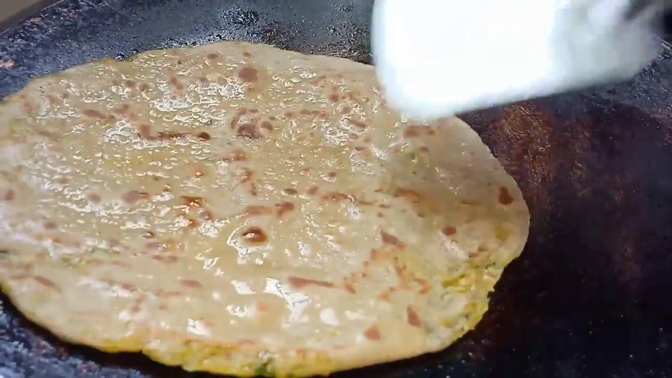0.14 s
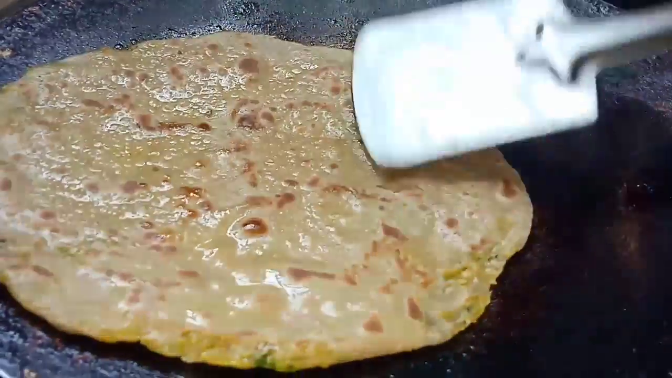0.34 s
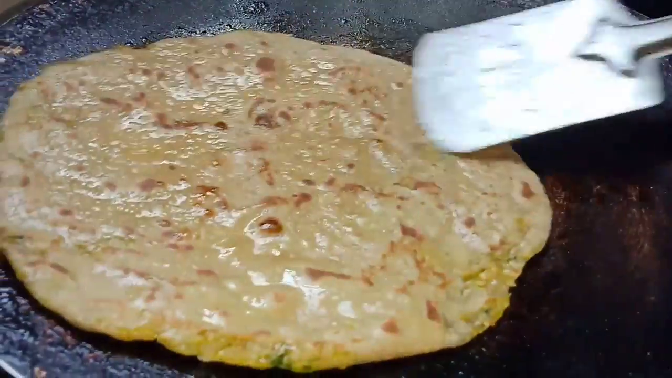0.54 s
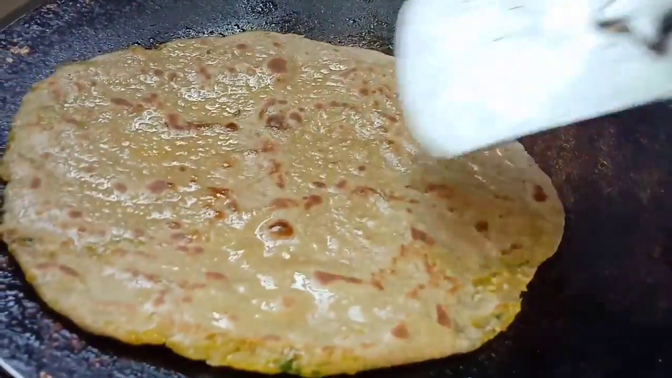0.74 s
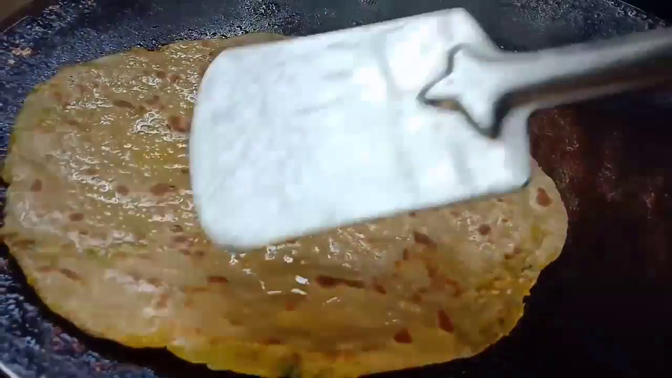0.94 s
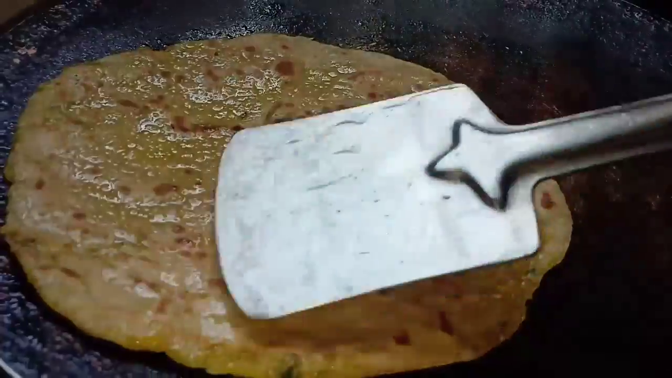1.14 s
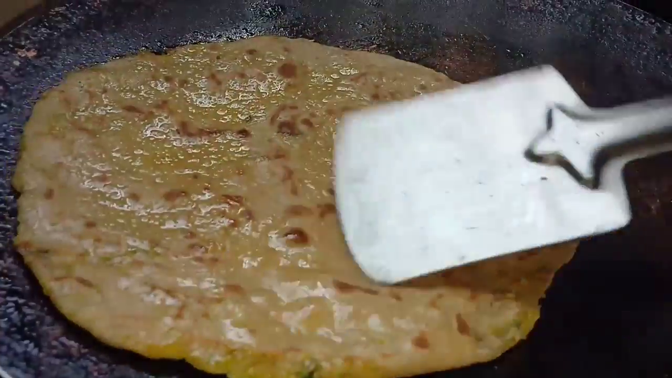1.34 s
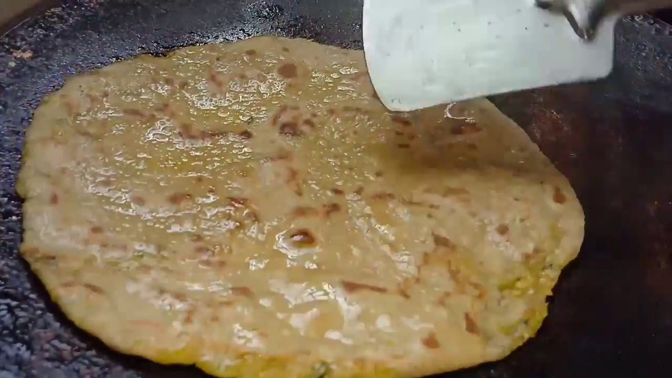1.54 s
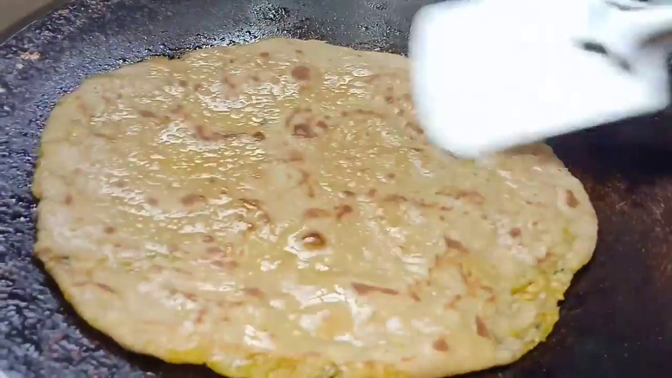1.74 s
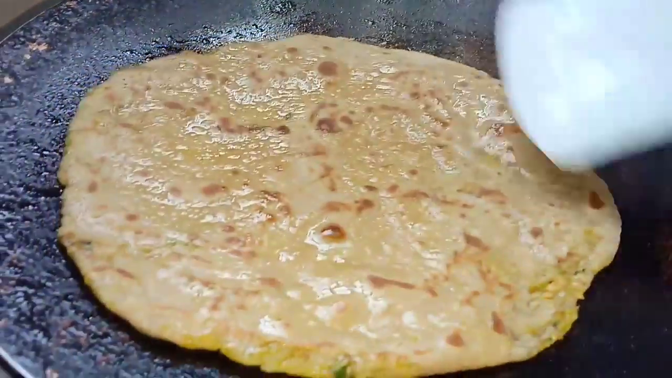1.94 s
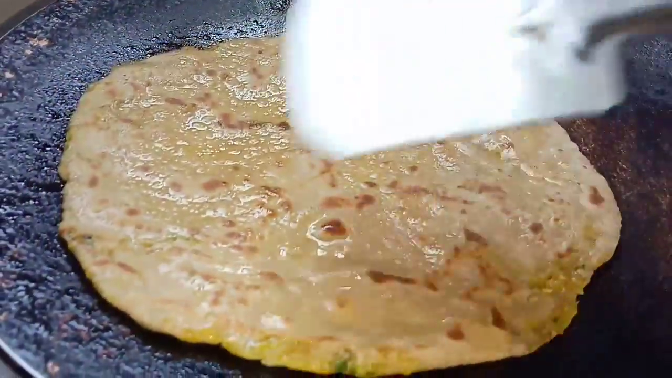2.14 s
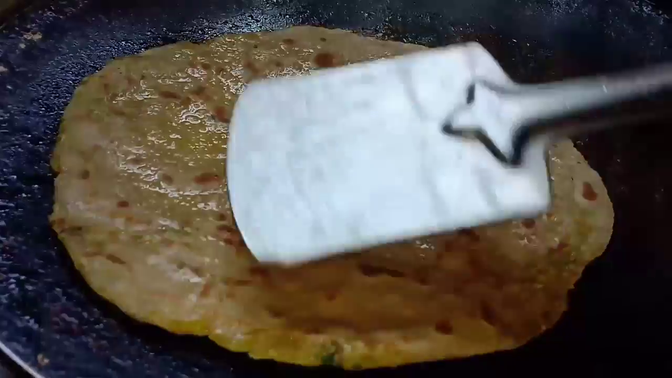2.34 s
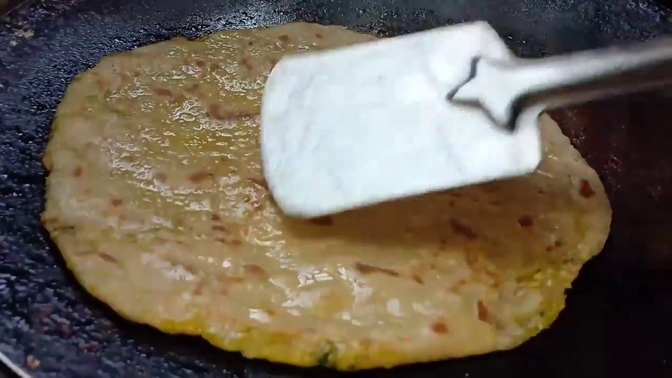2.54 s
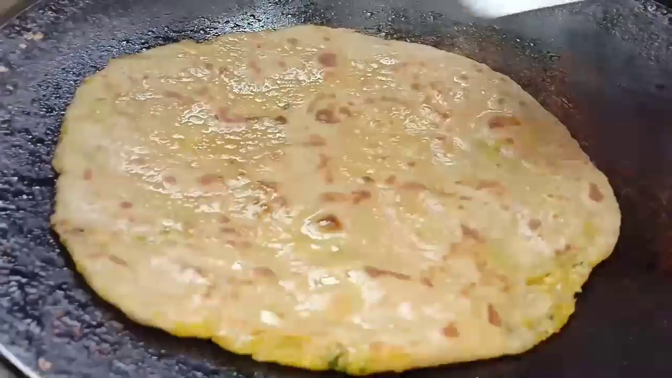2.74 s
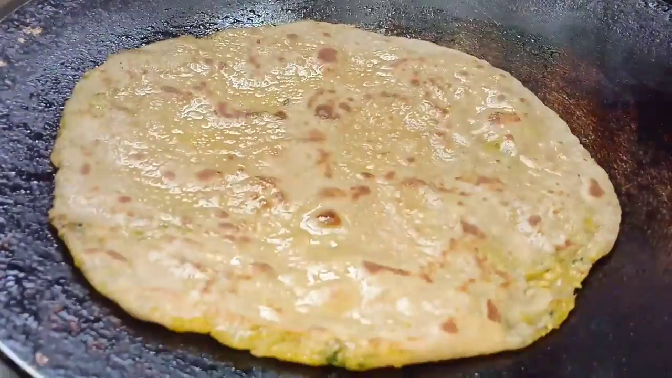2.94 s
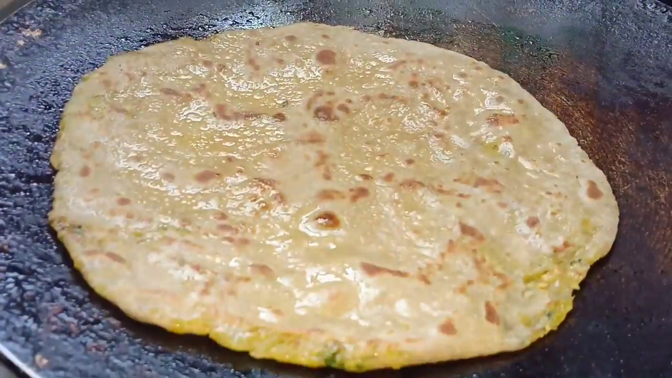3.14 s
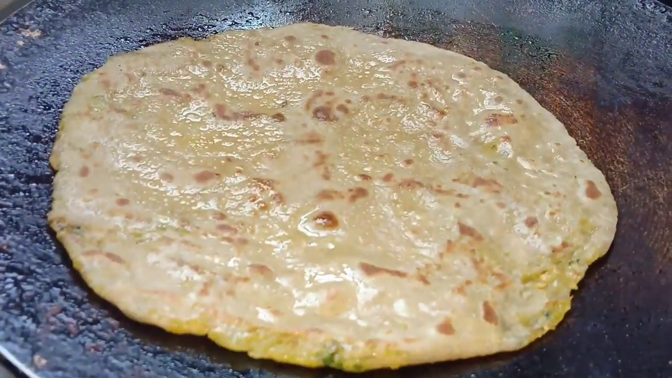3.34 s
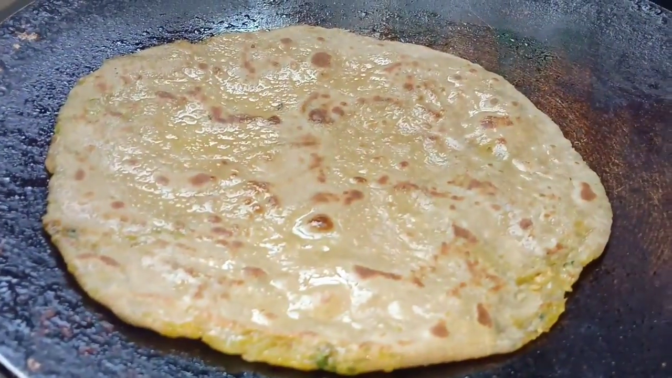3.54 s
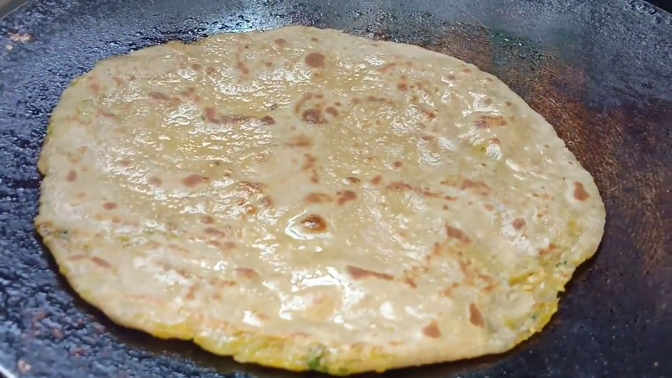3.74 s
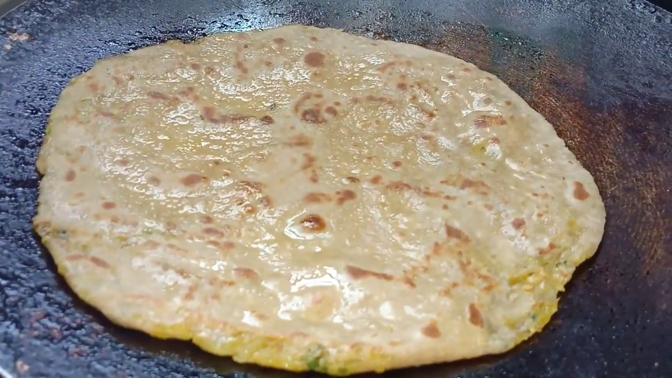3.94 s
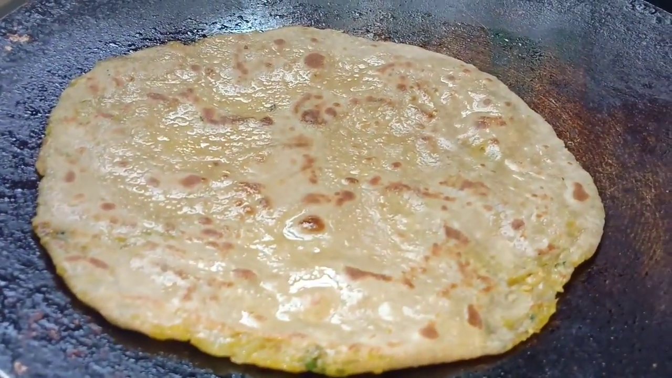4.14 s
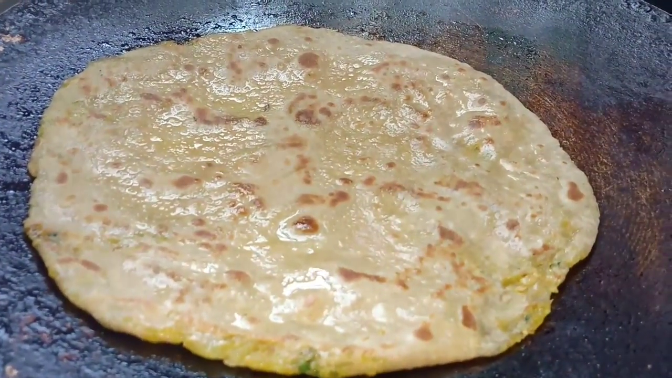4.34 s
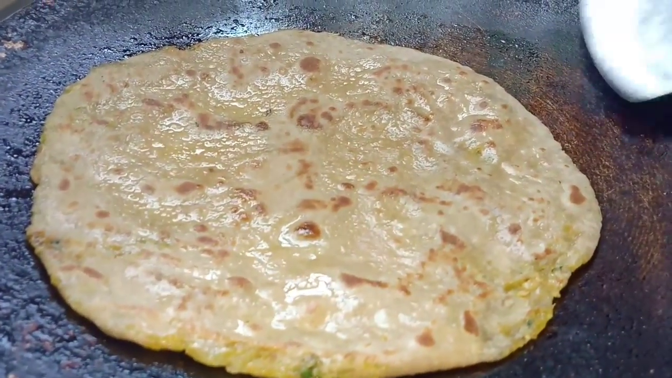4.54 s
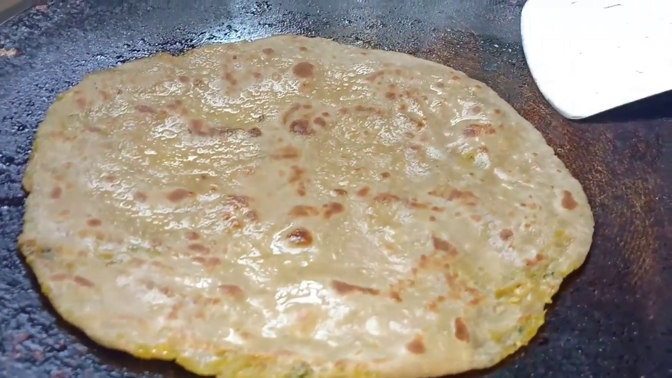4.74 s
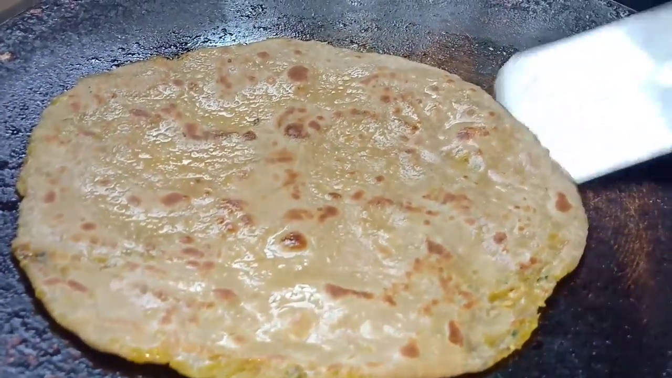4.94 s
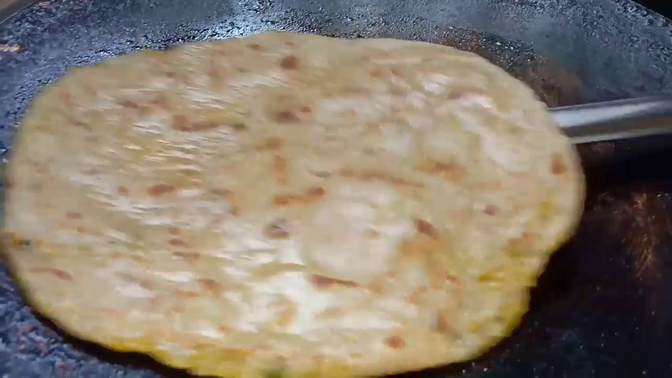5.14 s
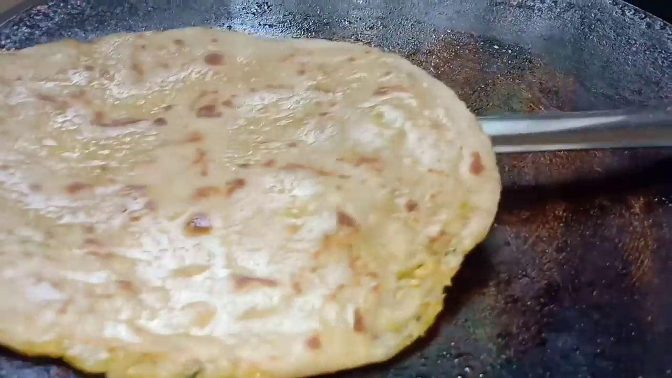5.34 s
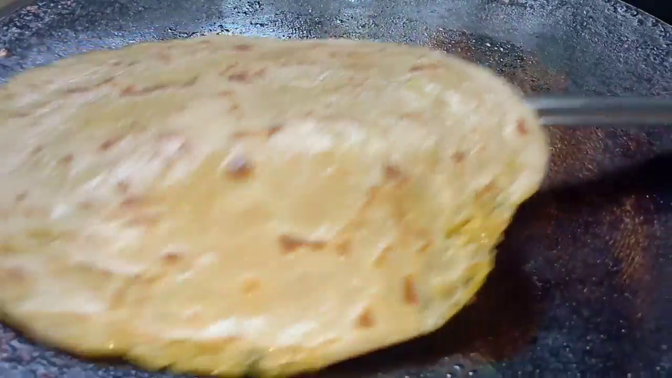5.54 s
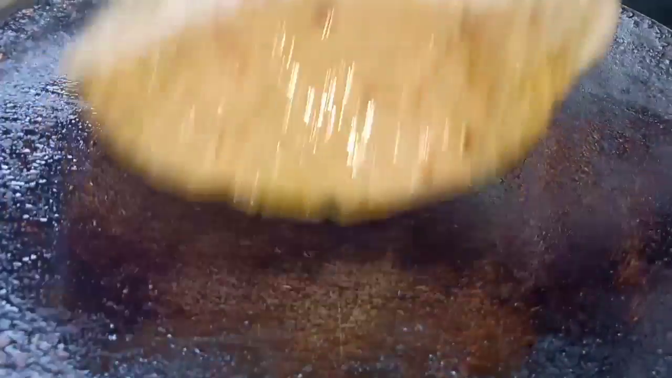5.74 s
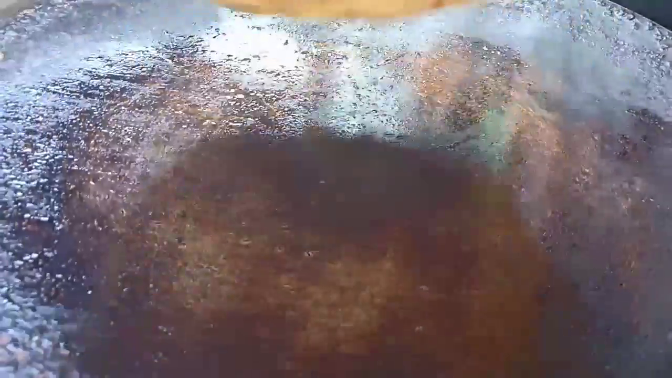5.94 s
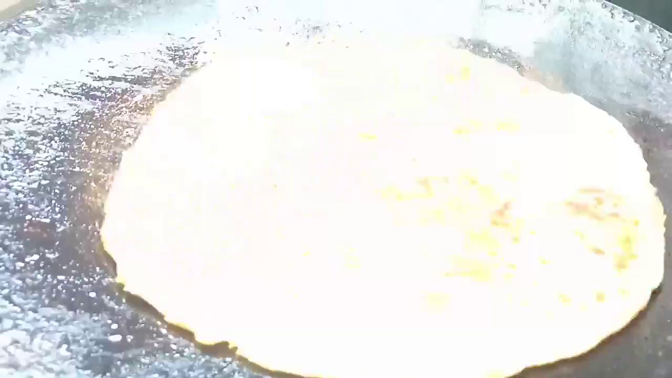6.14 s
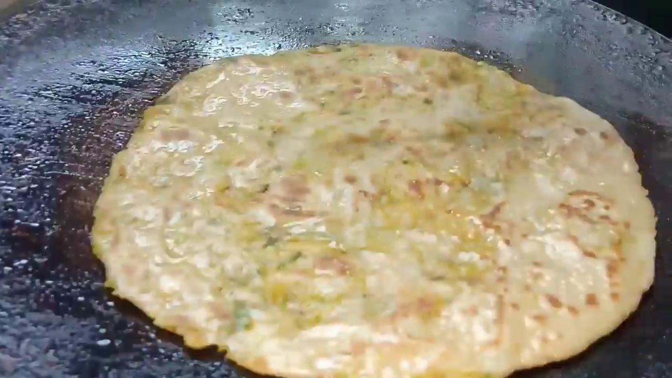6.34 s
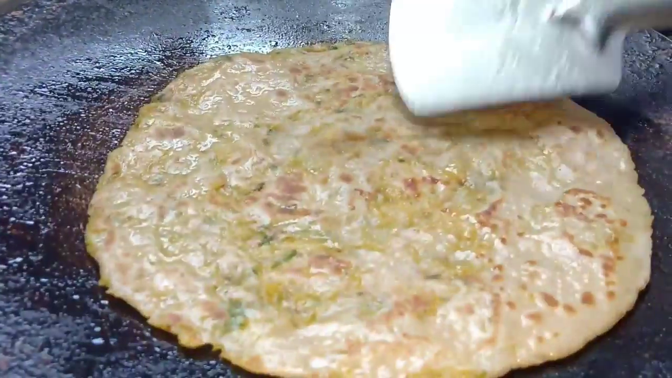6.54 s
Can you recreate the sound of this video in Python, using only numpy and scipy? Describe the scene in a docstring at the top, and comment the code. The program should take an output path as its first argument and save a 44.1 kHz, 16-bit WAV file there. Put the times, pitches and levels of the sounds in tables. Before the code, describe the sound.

Flatbread sizzles faintly on an iron griddle while a metal spatula pats it, clinks, scrapes underneath, then the bread flips over with a wet slap.

```python
"""Small kitchen, close on a hot iron griddle: a flatbread fries over a faint sizzle and a low hum.
First a steel spatula pats and rubs the bread (contact noise ringing pan modes), fat pops in short clicks
and thin steam whistles waver. Two dull thumps sound nearby (damped low modes). Then the blade clinks on
iron, scrapes under the bread (grains ringing blade modes) as the sizzle flares, and clinks again.
The turned bread lands with a wet slap, a third thump follows, and it fries on more softly under a last pat."""
import sys
import numpy as np
from scipy import signal
from scipy.fft import rfft, irfft
from scipy.io import wavfile
from scipy.ndimage import uniform_filter1d, map_coordinates

SR = 44100
rng = np.random.default_rng(int(sys.argv[2]) if len(sys.argv) > 2 else 0)


def persist_wave(psi):
    """Save psi, clipped to +-1, as 16-bit WAV."""
    counts = np.round(np.clip(psi, -1, 1) * 32767).astype(np.int16)
    wavfile.write(sys.argv[1], SR, np.atleast_2d(counts).T)


N = 290178
TIME = np.arange(N) / SR
HIT_TIME = TIME[:SR // 6]
PUSH_AT = SR // 40   # sample at which the push falls inside a blow

# All source levels below are taken before the balance in scene().
# Flat of the blade on bread and pan. Each row: time in seconds, low, middle and high level in dB,
# favoured ring in Hz, lead-in in seconds.
PAT_HITS = [(0.0235, -51, -43.5, -73, 2060, 0.0016), (0.1705, -41.5, -41, -51.5, 1000, 0.0034),
            (0.358, -35, -31, -40.5, 2270, 0.000083), (0.9192, -37, -37.5, -42.5, 640, 0.00041),
            (1.103, -44, -41.5, -48, 3130, .008), (1.264, -45, -40, -45, 795, 0.0095),
            (1.346, -49.5, -44.5, -45, 4000, 0.012), (1.961, -51, -47, -59, 2880, .003),
            (2.1648, -38, -33.5, -38.5, 3220, .0003), (2.373, -36, -34.5, -46.5, 744, 0.00065),
            (5.330, -46, -56, -52, 284, 0.002), (6.562, -44, -42, -48.5, 1680, 0.00036)]
# Edge of the blade on bare iron. Each row: time in seconds, low, middle and high level in dB,
# favoured ring in Hz, lead-in in seconds.
CLINK_HITS = [(4.5546, -46, -27, -33.5, 3300, 0.00009), (4.824, -61, -34.5, -52, 2530, 0.0057),
              (5.3175, -41, -24, -39.5, 1870, 0.0059), (5.346, -50, -35, -50, 1850, .006)]
# Blade sliding over the bread. Each row: start in seconds, length in seconds, low, middle and high level in dB.
RUB_STROKES = [(0.013, 0.059, -38, -44, -79), (0.417, .11, -53.5, -44, -49),
               (0.934, 0.021, -42.5, -53, -58), (1.14, 0.032, -49.5, -46.5, -52),
               (1.601, 0.16, -51, -45, -47.5), (6.337, 0.033, -47, -50, -56)]
# Oily bread landing patch by patch. Each row: time in seconds, level in dB, bass weight in dB,
# lead-in in seconds, contact decay in seconds.
SLAP_PATCHES = [(5.919, -50.5, -6, .006, 0.0084), (5.961, -34.5, -6.5, .011, 0.049),
                (5.986, -20, -2, 0.0057, 0.021), (6.0085, -23, 2, 0.0077, 0.01),
                (6.014, -16.5, 10.5, 0.0015, 0.0028)]
# Soft heavy thumps nearby. Each row: time in seconds, level in dB.
THUMP_HITS = [(2.81, -18.5), (3.941, -18.5), (6.052, -21)]
# Largest bursting droplets of fat. Each row: time in seconds, peak in dB.
FAT_POPS = [(0.4318, -21.5), (1.8417, -30), (1.848, -21), (1.8641, -19), (1.8684, -19), (2.4967, -29),
            (4.989, -27), (5.206, -25), (5.304, -20), (5.3343, -26), (5.352, -21), (5.6392, -31),
            (6.063, -11), (6.2032, -31)]
# Faint steam whistles from pores in the crust. Each row: start in seconds, length in seconds,
# first and last pitch in Hz, level in dB.
STEAM_WHISTLES = [(0.599, 2.8, 7010, 7350, -65), (0.597, 1.9, 4920, 4830, -70), (2.6, 1.9, 2500, 2777, -61)]

# Resonances of the spatula blade. Each row: frequency in Hz, width in Hz, level in dB.
BLADE_MODES = [(550, 170, -14), (767, 39, -11), (980, 85, -23), (1410, 58, 6), (1750, 61, 8),
               (1960, 130, -0.5), (2323, 49, 7.5), (2536, 143, 5.5), (2920, 43, -5), (3334, 51, 7.5),
               (3580, 170, 1.5), (4140, 30, 6.5), (4280, 31, -8), (5060, 45, -22), (6700, 47, -17),
               (8100, 43, -13), (10500, 68, -17), (14400, 1000, -13)]
# Resonances of the iron pan. Each row: frequency in Hz, width in Hz, level in dB.
PAN_MODES = [(630, 150, -4), (803, 56, 1), (1010, 180, -4), (1350, 32, -11), (1726, 130, -4.5),
             (2476, 37, -4.5), (2820, 47, -3), (3460, 130, -2.5), (4035, 120, -3.5), (4600, 37, -1),
             (6550, 20, 3.5), (8220, 91, 2.5), (9090, 67, -5), (10210, 81, 2), (11600, 150, -8),
             (14000, 130, -11)]
# What a thump sets ringing. Each row: frequency in Hz, level in dB, 60 dB decay in seconds.
THUD_MODES = [(106, -23, 0.17), (138.3, -15.5, 0.24), (159, 5, .026), (221, -4.5, 0.024),
              (523, -17.5, 0.039), (1115, -9.5, 0.025)]
# Low drone of the kitchen. Each row: frequency in Hz, level in dB.
HUM_TONES = [(96.9, -64), (140.0, -66)]

# Tone of blade on bread. Each row: frequency in Hz, relative dB.
PAT_TONE = [(150, 7.5), (380, -1.5), (700, 1.5), (1700, -7.5), (4000, -13), (5500, -27), (8000, -24),
            (10000, -35), (15500, -40)]
# Tone of steel on iron. Each row: frequency in Hz, relative dB.
STEEL_TONE = [(200, 7), (600, 8.5), (1500, -7.5), (4200, -4), (5500, -5), (7800, 7), (10000, -2.5),
              (15500, -11)]
# Tone of steel dragged over crust. Each row: frequency in Hz, relative dB.
RUB_TONE = [(150, 9.5), (280, 11.5), (450, 3), (900, 2), (2200, 23), (4000, 9), (5500, -10.5), (8000, -1.5),
            (10000, -13), (15500, -15)]
# Tone of the wet landing. Each row: frequency in Hz, relative dB.
SLAP_TONE = [(100, -16.5), (270, 1), (420, -6.5), (650, 0.5), (850, -0.5), (1100, -1), (1400, -2),
             (2100, -1.5), (3700, 5), (4500, -5), (5600, -13), (7600, -6.5), (10000, -18.5), (15500, -25)]
# Tone of pops and crackle. Each row: frequency in Hz, relative dB.
POP_TONE = [(500, -4.5), (2000, -11), (4000, 3), (5500, -13.5), (8000, -2), (10500, -10.5), (15500, -12.5)]
# Tone of the fine bubbling. Each row: frequency in Hz, relative dB.
SIZZLE_TONE = [(300, -1.5), (800, 0.5), (1800, 1), (2650, 1), (3400, 3.5), (4150, 0), (4700, -9),
               (5600, -15.5), (7500, -7), (8600, -12.5), (10000, -19), (15500, -21.5)]
# Tone of the stove and room rumble. Each row: frequency in Hz, relative dB.
RUMBLE_TONE = [(15, 6.5), (25, -4), (59, -16.5), (81, -4.5), (130, -2), (151, -2.5), (172, -13.5),
               (213, -9.5), (387, -19.5), (425, -17.5), (600, -20), (780, -27), (1320, -120)]
# Tone of the kitchen's reflections. Each row: frequency in Hz, relative dB.
KITCHEN_TONE = [(90, 6.5), (200, 2.5), (280, 10.5), (400, 3.5), (600, -2.5), (1000, -2.5), (2500, 3.5),
                (4000, -6), (9000, -6)]
# How long the kitchen rings. Each row: frequency in Hz, 60 dB decay in seconds.
KITCHEN_DECAY = [(100, 0.85), (300, 0.47), (1000, 0.48), (3000, 0.64), (8000, 0.46), (16000, 0.13)]

PAT_DECAY_S, CLINK_DECAY_S = 0.0062, 0.0063   # how fast the contact dies on bread and on iron
RUB_ATTACK_S, RUB_RELEASE_S = 0.036, 0.05
# One push along the iron: the force swells until the blade is under the bread, eases, and the blade lifts.
PUSH_START_S, PUSH_PEAK_S, PUSH_END_S = 4.705, 5.01, 5.122
PUSH_ATTACK_S, PUSH_RELEASE_S = 0.045, 0.085
PUSH_RISE_DB_PER_S, PUSH_FALL_DB_PER_S = 80.5, 57
SCRAPE_RING_DB, SCRAPE_GRIT_DB = -19.5, -39   # at full force
GRIT_FOLLOWS = 0.72                           # share of the force's swing in dB
# As the blade bends, ever lower modes ring.
STIFF_HZ, BENT_HZ, BEND_HZ_PER_S = 3630, 553, 9900
# Frying is steady, flares when the blade bares the fat, dies away, and resumes softly on the fresh side.
HISS_DB, SPRAY_DB, HISS_FOLLOWS = -50.5, -56, .45   # share of the spray's swing in dB
FLARE_S, FLARE_RISE_S, FLARE_DB, FLARE_FALL_DB_PER_S = 5.36, 0.23, 7, 24.5
FRESH_SIDE_S, FRESH_SIDE_DB = 6.0, -2.5
WHISTLE_FADE_S, WHISTLE_WANDER = 0.27, .003
WHISTLE_GLIDE_POWER = 2.7   # the glide quickens as the pore narrows
RUMBLE_DB = -49
CUTOFF_HZ = 15700


def pats():
    """The flat of the blade knocks on bread and pan: soft cracks over ringing iron."""
    return knocks(PAT_HITS, PAT_DECAY_S, PAN_MODES, PAT_TONE,
                  crack_db=-7.5, ring_db=-0.5, ring_width_hz=190, chatter=1.85)


def clinks():
    """The blade's edge meets bare iron and the steel rings."""
    return knocks(CLINK_HITS, CLINK_DECAY_S, BLADE_MODES, STEEL_TONE,
                  crack_db=-9, ring_db=8, ring_width_hz=150, chatter=3)


def knocks(hits, decay_s, modes, spectrum, crack_db, ring_db, ring_width_hz, chatter):
    """Each knock is a crack plus ringing metal; where it lands favours one ring and weights the registers."""
    out = np.zeros(N)
    for s, *levels, ring_hz, lead_s in hits:
        force = contact(decay_s, chatter, lead_s)
        metal = resonate(force, [*modes, (ring_hz, ring_width_hz, ring_db)])
        wave = colour(amp(crack_db) * force + metal, spectrum)
        parts = registers(wave, 1470)
        blow = sum(blow_of(db, part) for db, part in zip(levels, parts))
        add(out, s - PUSH_AT / SR, blow)
    return out


def rubs():
    """Steel dragged over the crust: fine friction grains, coloured by the pan."""
    friction = grains(per_s=6500, spread_db=3.0)
    rubbed = friction + amp(4) * resonate(friction, PAN_MODES)
    parts = registers(colour(rubbed, RUB_TONE), 1045)
    gains = np.zeros((3, N))
    for s, length_s, *levels in RUB_STROKES:
        stroke = envelope(s, length_s, RUB_ATTACK_S, RUB_RELEASE_S)
        gains += np.outer(amp(levels), stroke)
    return sum(gain * rms_one(part) for gain, part in zip(gains, parts))


def scrape():
    """The edge catches on rough iron and rings the blade; its low modes open up under pressure."""
    start, size = round(PUSH_START_S * SR), SR
    during = slice(start, start + size)
    t = TIME[during]
    rise_db = PUSH_RISE_DB_PER_S * (t - PUSH_PEAK_S)
    fall_db = PUSH_FALL_DB_PER_S * (PUSH_PEAK_S - t)
    force_db = np.minimum(rise_db, fall_db)
    touching = envelope(PUSH_START_S, PUSH_END_S - PUSH_START_S, PUSH_ATTACK_S, PUSH_RELEASE_S)[during]
    lowest_hz = np.maximum(STIFF_HZ - BEND_HZ_PER_S * (t - PUSH_START_S), BENT_HZ)
    catches = (grains(per_s=3700, spread_db=1.0) * amp(0.41 * drift(140)))[during]
    ringing = 0
    for hz, width, db in BLADE_MODES:
        opening = 1 / (1 + (lowest_hz / hz) ** 8)
        # the point of contact wanders along the edge, favouring now one mode, now another
        favour = amp(2 * drift(22, size=size))
        # the flexing blade bends each mode slightly
        bent = np.arange(size) + np.cumsum(.005 * drift(14, size=size))
        mode = map_coordinates(resonate(catches, [(hz, width, db)]), [bent])
        ringing = ringing + opening * favour * mode
    steel = colour(amp(-17.5) * band(catches, 1500, 14000) + ringing, STEEL_TONE)
    levels = SCRAPE_RING_DB + force_db, SCRAPE_GRIT_DB + GRIT_FOLLOWS * force_db
    parts = band(steel, 367, 3730), band(steel, 4350, SR / 2)
    out = np.zeros(N)
    for db, part in zip(levels, parts):
        # the hand sets the loudness, however many modes ring
        loudness = np.sqrt(uniform_filter1d(part ** 2, size=1800) + 1e-12)
        out[during] += touching * amp(db) * part / loudness
    return out


def slap():
    """Fat flashes under each patch that lands; the last traps air and is the deepest."""
    out = np.zeros(N)
    for s, db, bass_db, lead_s, decay_s in SLAP_PATCHES:
        force = contact(decay_s, 2.1, lead_s)
        wave = colour(force + amp(-0.5) * resonate(force, PAN_MODES), SLAP_TONE)
        weighted = colour(wave, [(1200, bass_db), (2200, 0)])
        add(out, s - PUSH_AT / SR, blow_of(db, weighted))
    return out


def thumps():
    """A soft push rings low, heavily damped modes, with a light tick of contact."""
    out = np.zeros(N)
    body = 0
    for hz, db, t60 in THUD_MODES:
        body = body + amp(db - 60 * HIT_TIME / t60) * np.sin(2 * np.pi * hz * HIT_TIME)
    soft_start = 1 - np.exp(-HIT_TIME / 0.0035)
    fade = 1 - HIT_TIME / HIT_TIME[-1]
    body = band(body * soft_start * fade, 75, 2600)
    for s, db in THUMP_HITS:
        add(out, s, -amp(db) * body)
        tick = colour(contact(0.016, chatter=3.9, lead_s=0.00043), PAT_TONE)
        add(out, s + 0.00324 - PUSH_AT / SR, blow_of(db - 26.5, band(tick, 370, 3200)))
    return out


def pops():
    """Single bursting droplets: very short bright clicks."""
    out = np.zeros(N)
    for s, db in FAT_POPS:
        click = colour(contact(0.001, chatter=0.46), POP_TONE)
        add(out, s - PUSH_AT / SR, amp(db) * click / np.abs(click).max())
    return out


def sizzle():
    """Countless tiny bubbles burst in the fat; sparser crackles grow as the spray rises."""
    since = TIME - FLARE_S
    rise_db = FLARE_DB * np.clip(1 + since / FLARE_RISE_S, 0, 1)
    flare_db = rise_db - FLARE_FALL_DB_PER_S * np.maximum(since, 0)
    vigour_db = np.where(TIME < FRESH_SIDE_S, flare_db, FRESH_SIDE_DB)
    hiss_gain = amp(HISS_DB + HISS_FOLLOWS * vigour_db)
    spray_gain = amp(SPRAY_DB + vigour_db)
    fizz = colour(grains(per_s=16000, spread_db=2.5), SIZZLE_TONE)
    crackle = colour(grains(per_s=220, spread_db=9.0), POP_TONE)
    fat = fizz + amp(-21) * crackle * amp(vigour_db)
    hiss = hiss_gain * rms_one(band(fat, 386, 2950))
    spray = spray_gain * rms_one(band(fat, 4660, SR / 2))
    return hiss + spray


def whistle(start_s, length_s, first_hz, last_hz, db):
    """A thin jet of steam: a gliding sine, wavering in pitch and level."""
    age = np.clip((TIME - start_s) / length_s, 0, 1)
    glide = first_hz + (last_hz - first_hz) * age ** WHISTLE_GLIDE_POWER
    pitch = glide * (1 + WHISTLE_WANDER * drift(4.9) + 0.00403 * drift(300))
    gain = amp(db) * envelope(start_s, length_s, WHISTLE_FADE_S, WHISTLE_FADE_S)
    flutter = amp(2.9 * drift(26.3))
    return gain * flutter * np.sin(2 * np.pi * np.cumsum(pitch) / SR)


def background():
    """Low rumble of the stove and room as coloured noise, with a drone of narrow wavering resonances."""
    rumble = amp(RUMBLE_DB) * rms_one(colour(rng.standard_normal(N), RUMBLE_TONE))
    drone = 0
    for hz, db in HUM_TONES:
        drone = drone + amp(db) * rms_one(resonate(rng.standard_normal(N), [(hz, 9, 0)]))
    return rumble + amp(1.0) * band(drone, 65, 204)


def kitchen(x):
    """Diffuse reflections of hard walls: decaying noise that dies fastest in the top treble."""
    t, edges = TIME[:SR * 3 // 4], np.geomspace(50, 18000, 10)
    tail = 0
    for low, high in zip(edges, edges[1:]):
        t60 = at_hz(KITCHEN_DECAY, np.sqrt(low * high))
        tail = tail + band(rng.standard_normal(len(t)), low, high) * amp(-60 * t / t60)
    # many overlapping room modes share the energy evenly
    modes = rfft(tail, 2 * SR)
    spread = np.sqrt(uniform_filter1d(np.abs(modes) ** 2, size=200) + 1e-3)
    tail = irfft(modes / spread)[:len(t)]
    # the first reflections arrive after 2 ms
    tail = band(tail, 92, 20700) * np.clip((t - .002) / 0.0053, 0, 1)
    return signal.fftconvolve(x, colour(tail / np.linalg.norm(tail), KITCHEN_TONE))[:N]


def contact(decay_s, chatter, lead_s=.0002):
    """Force of a blow: a swelling graze, one push, then a dying chatter of tiny touches."""
    t = HIT_TIME - PUSH_AT / SR
    swell = np.exp(np.where(t < 0, t / max(lead_s, 1e-4), -t / max(decay_s, 1e-4)))
    force = rng.standard_normal(len(t)) * swell
    force *= chatter / np.linalg.norm(force)
    force[PUSH_AT] += 1
    return force


def grains(per_s, spread_db):
    """Random clicks of uneven size and either sign."""
    sizes = amp(spread_db * np.minimum(rng.exponential(1, N), 5)) * rng.choice([-1, 1], N)
    return rms_one(sizes * (rng.random(N) < per_s / SR))


def drift(per_s, size=N):
    """Random wander of spread 1, with per_s turning points a second."""
    knots = rng.standard_normal(size // 40)
    return rms_one(np.interp(TIME[:size] * per_s, np.arange(len(knots)), knots))


def resonate(x, modes):
    """Parallel resonances of (Hz, width in Hz, dB)."""
    out = 0
    for hz, width, db in modes:
        r = np.exp(-np.pi * width / SR)
        zeros = np.array([1, 0, -1]) * (1 - r * r) / 2
        poles = [1, -2 * r * np.cos(2 * np.pi * hz / SR), r * r]
        out = out + amp(db) * signal.lfilter(zeros, poles, x + 1e-18)
    return out


def colour(x, spectrum):
    """Causal (minimum-phase) filter with the given spectrum."""
    size = 2048
    gains = amp(at_hz(spectrum, np.arange(size // 2 + 1) * SR / size))
    cepstrum = irfft(np.log(gains))
    # fold the cepstrum onto positive time
    cepstrum[1:size // 2] *= 2
    cepstrum[size // 2 + 1:] = 0
    return signal.fftconvolve(x, irfft(np.exp(rfft(cepstrum))))[:len(x)]


def band(x, low_hz, high_hz):
    """Band-pass filter."""
    edges = [low_hz, min(high_hz, .45 * SR)]
    return signal.sosfilt(signal.butter(3, edges, "band", fs=SR, output="sos"), x)


def registers(x, low_top_hz):
    """Low, middle and high part of a sound."""
    return band(x, 113, low_top_hz), band(x, low_top_hz, 4090), band(x, 5220, SR / 2)


def envelope(start_s, length_s, attack_s, release_s):
    """Gain that rises, holds, and dies away once the length is over."""
    t = TIME - start_s
    return np.clip(t / attack_s, 0, 1) * np.exp(-np.clip((t - length_s) / release_s, 0, 20))


def blow_of(db, wave):
    """Scale a blow to a level, its whole energy counted over 20 ms."""
    return amp(db) * wave / np.linalg.norm(wave) * np.sqrt(SR / 50)


def add(out, s, wave):
    """Mix a short sound in at time s."""
    at = max(round(s * SR), 0)
    out[at:at + len(wave)] += wave[:max(N - at, 0)]


def at_hz(points, hz):
    """Read a table on a log-frequency axis."""
    known, values = np.transpose(points)
    return np.interp(np.log(np.maximum(hz, 1)), np.log(known), values)


def amp(db):
    """Decibels to amplitude."""
    return 10 ** (np.asarray(db) / 20)


def rms_one(x):
    """Scale to an RMS of 1."""
    return x / np.sqrt(np.mean(x ** 2) + 1e-20)


def scene():
    """Balance the close sounds, send a share of each blow, slide and pop to the room, and lay the steady bed."""
    # each row: direct sound, share sent to the room in dB
    close = [
        (amp(-1.0) * pats(), -2.5),
        (amp(-4.0) * clinks(), -4.5),
        (rubs() + amp(-2.5) * scrape(), -8.5),
        (amp(2.5) * slap(), -8.0),
        (amp(5.0) * thumps(), -9.5),
        (amp(2.0) * pops(), -3.5),
    ]
    direct = sum(sound for sound, _ in close)
    to_room = sum(amp(send_db) * sound for sound, send_db in close)
    steam = sum(whistle(*row) for row in STEAM_WHISTLES)
    steady = amp(-0.87) * sizzle() + steam + background()
    return (direct + kitchen(to_room) + steady)[None]


def record(dry):
    """The microphone drops the deep bass and rounds the highest peaks; the top is cut."""
    thin = signal.sosfilt(signal.butter(3, 52, "high", fs=SR, output="sos"), dry)
    rounded = thin / (1 + (thin / .85) ** 4) ** .25
    return signal.sosfilt(signal.ellip(12, .1, 95, CUTOFF_HZ, fs=SR, output="sos"), rounded)


dry = scene()
out = record(dry)
persist_wave(out)
```